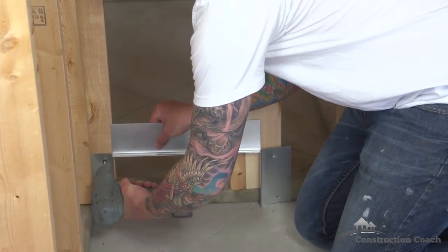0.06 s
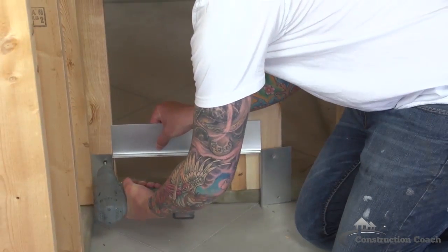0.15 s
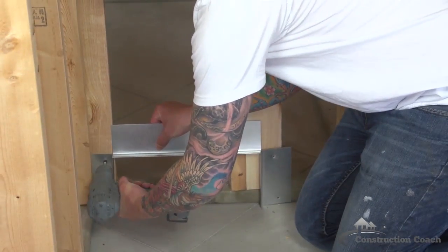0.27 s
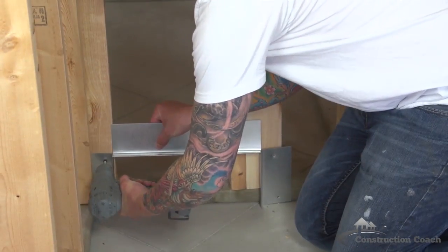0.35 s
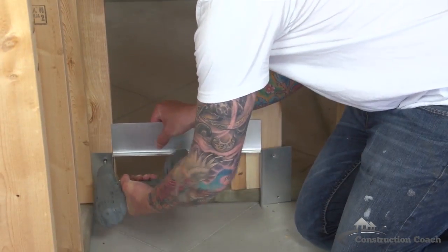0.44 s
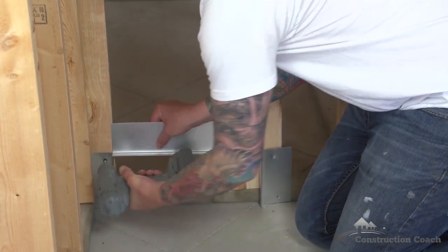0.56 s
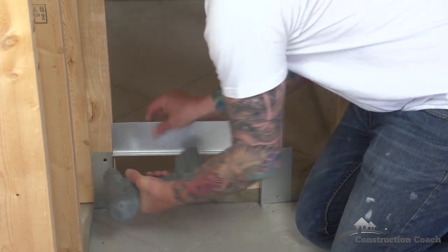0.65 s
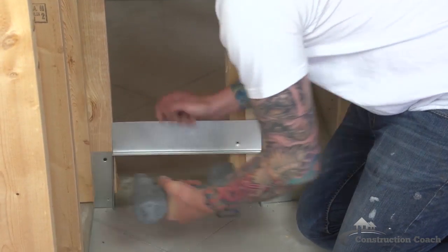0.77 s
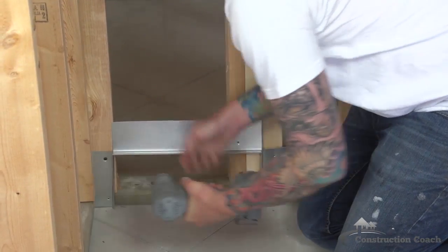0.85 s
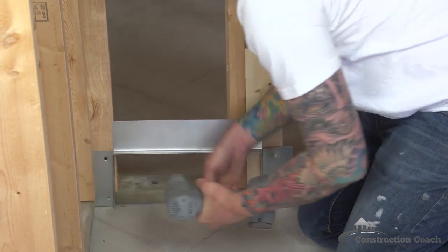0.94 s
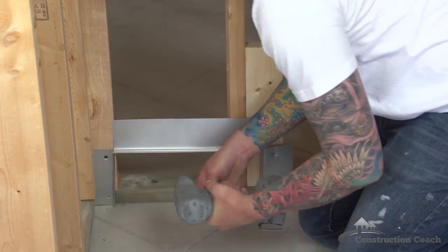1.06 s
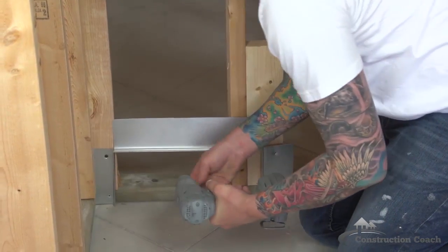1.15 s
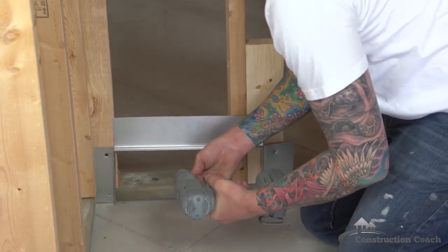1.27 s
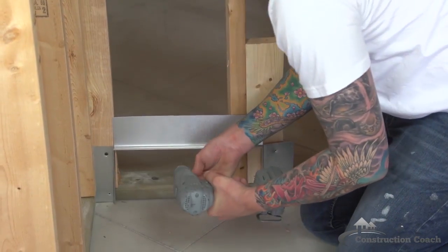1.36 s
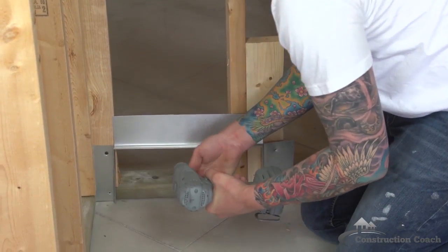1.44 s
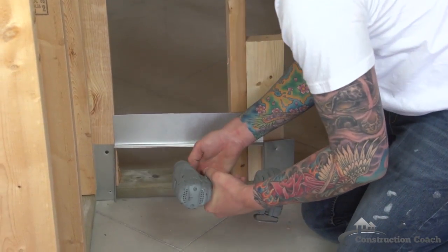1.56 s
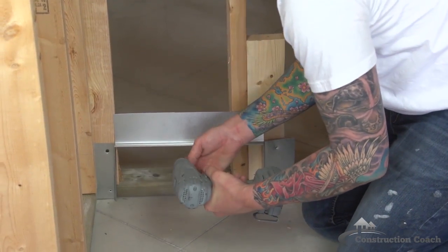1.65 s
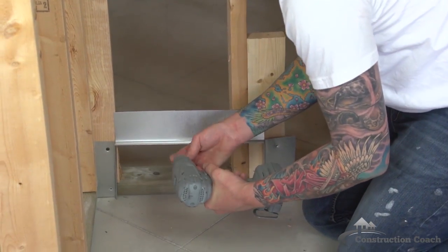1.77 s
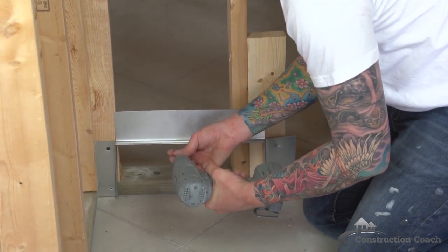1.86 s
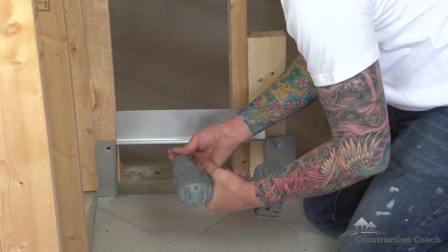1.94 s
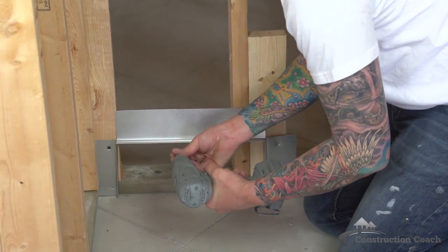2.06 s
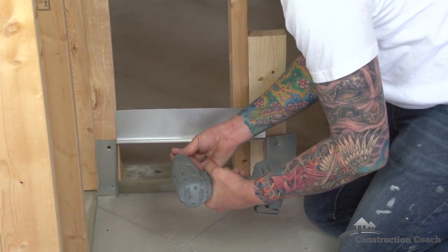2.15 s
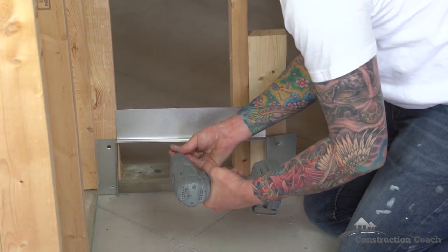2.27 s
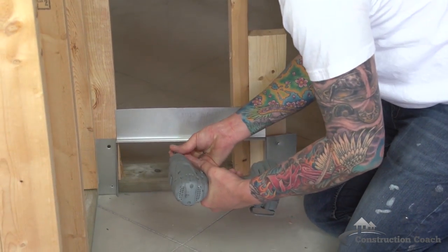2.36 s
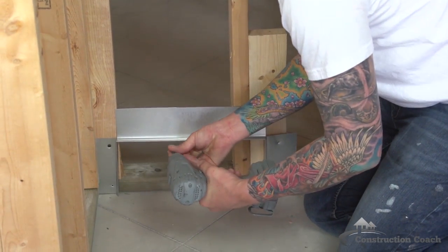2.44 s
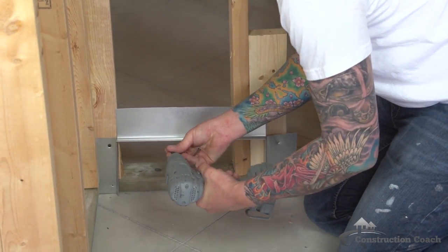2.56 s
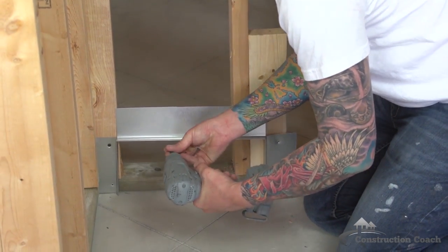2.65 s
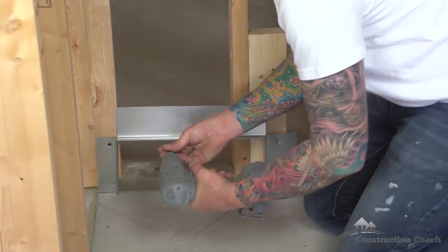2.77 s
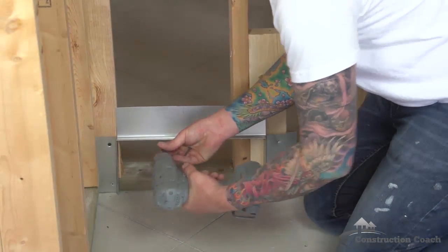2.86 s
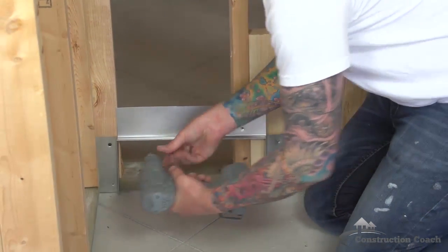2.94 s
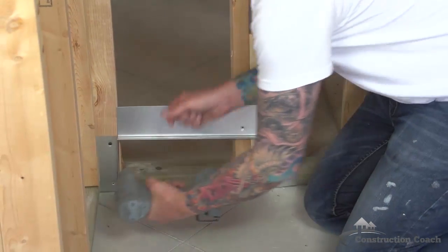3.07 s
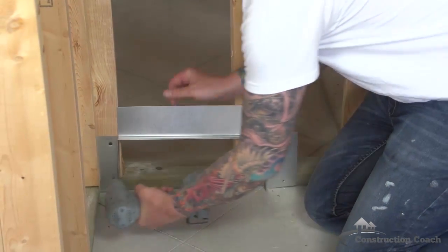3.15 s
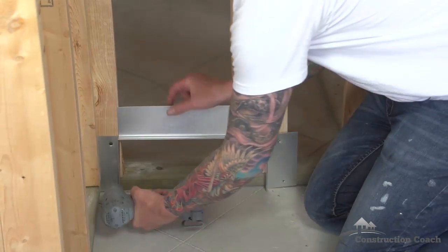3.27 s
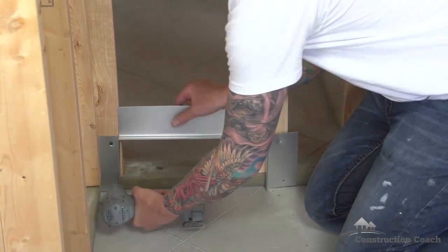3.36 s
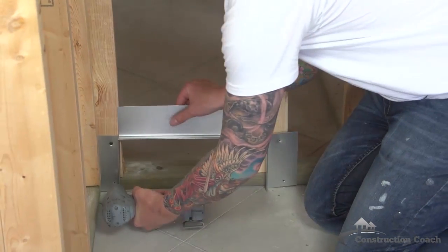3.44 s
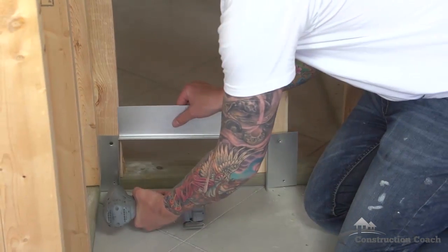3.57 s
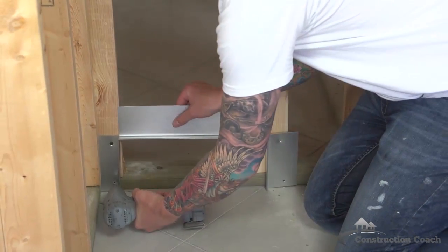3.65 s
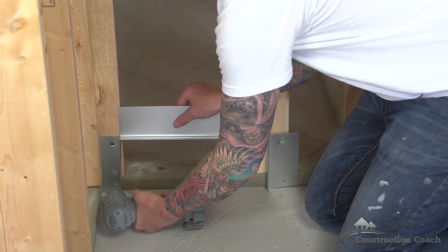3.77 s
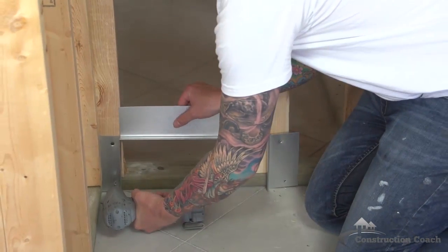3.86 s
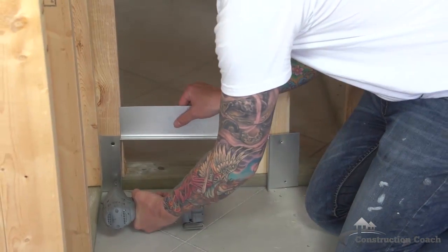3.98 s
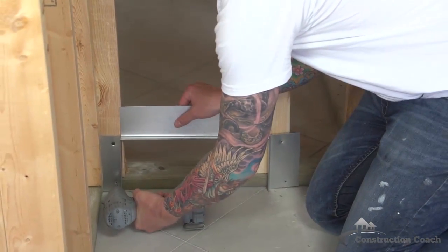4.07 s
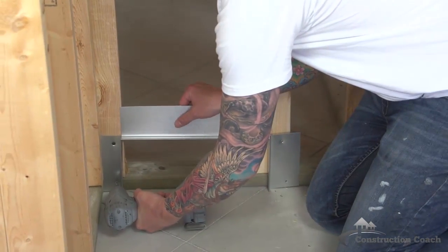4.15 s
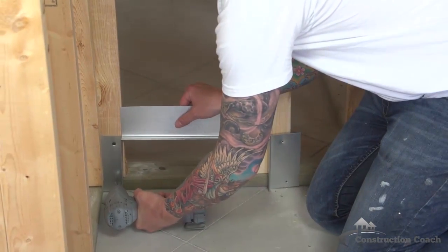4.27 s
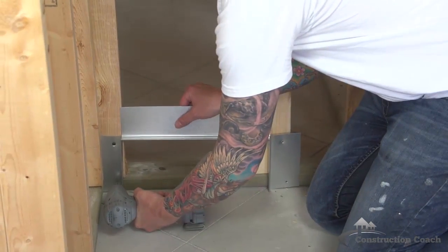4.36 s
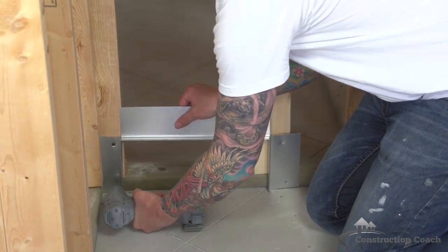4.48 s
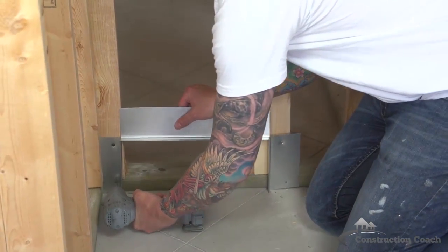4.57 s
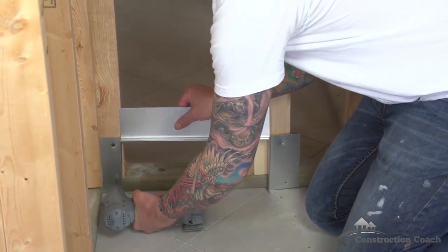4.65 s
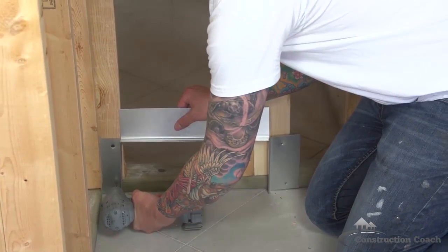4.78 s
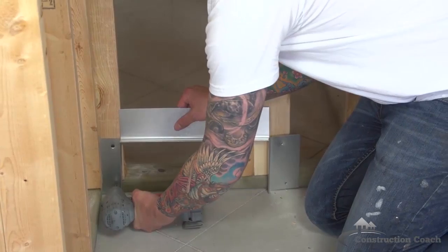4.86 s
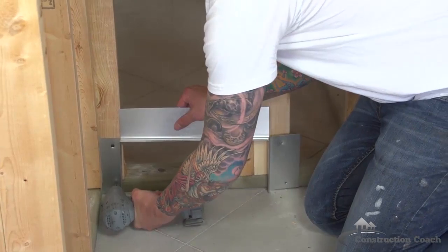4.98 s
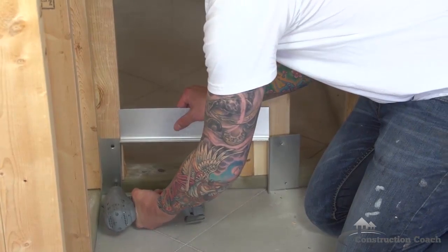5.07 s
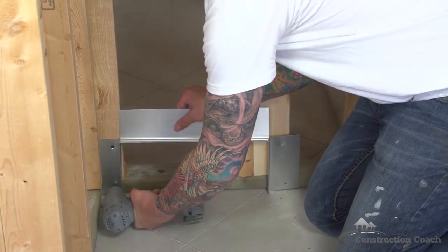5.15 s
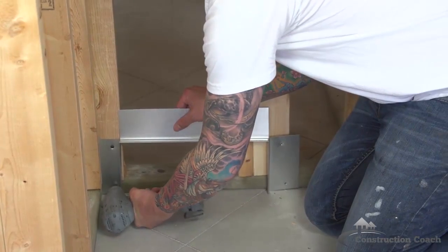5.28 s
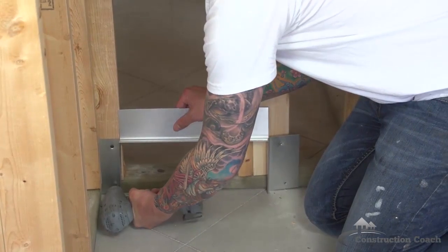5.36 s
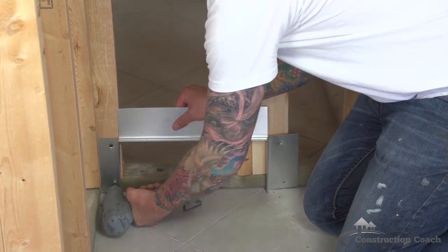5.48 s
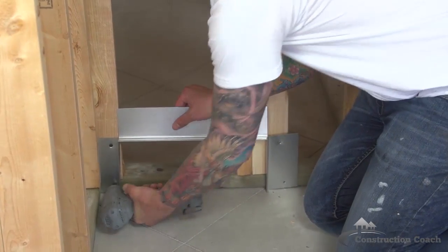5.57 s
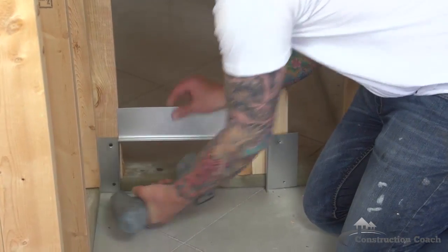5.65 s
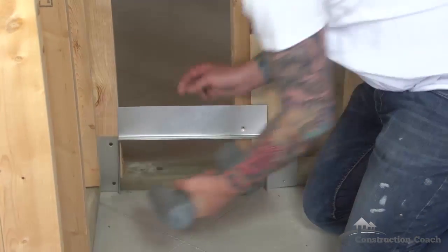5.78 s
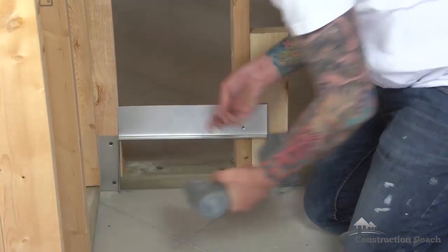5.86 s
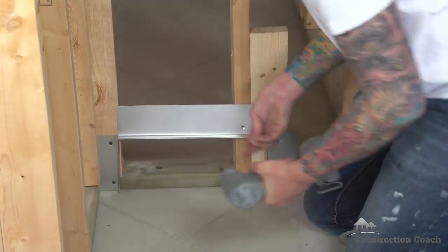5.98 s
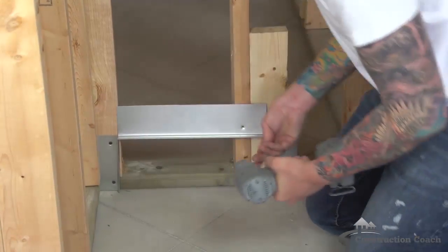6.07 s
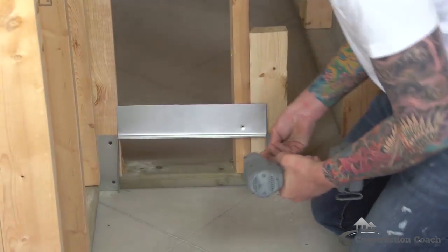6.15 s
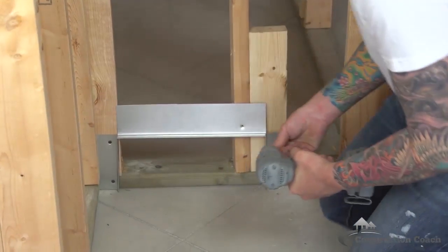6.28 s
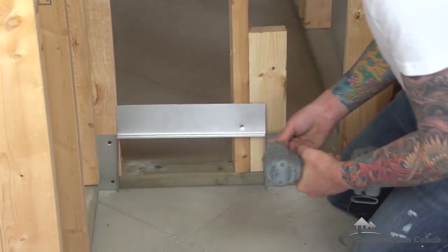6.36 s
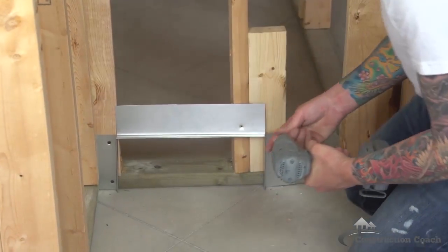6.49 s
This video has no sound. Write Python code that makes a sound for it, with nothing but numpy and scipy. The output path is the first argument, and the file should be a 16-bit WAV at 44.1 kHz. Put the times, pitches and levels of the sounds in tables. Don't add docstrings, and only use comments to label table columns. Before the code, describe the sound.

Close in a bare concrete basement, a cordless drill snaps on, whines briefly and brakes with a clack, then gives a short low groan. Loose screws tinkle, the bit ticks against a screw head, sheet metal scrapes and the tip patters on wood. Two longer whirring pulls follow, then a last growl ends in a loud double crack. Light ticks finish, over faint low rumble and hiss.

```python
import sys
import numpy as np
from scipy import signal
from scipy.fft import rfft, irfft
from scipy.io import wavfile
from scipy.ndimage import uniform_filter1d

SR = 44100
rng = np.random.default_rng(int(sys.argv[2]) if len(sys.argv) > 2 else 0)


def inscribe(sig):
    pcm = np.round(np.clip(np.atleast_2d(sig).T, -1, 1) * 32767)
    wavfile.write(sys.argv[1], SR, pcm.astype(np.int16))


def linear_from_db(decibels):
    return 10 ** (np.asarray(decibels, float) / 20)


N = 287532
T = np.arange(N) / SR

# [f/Hz, density/dB]
AIR_COLOUR = [(12, -37), (20, -10.5), (97, 1), (157, -9), (210, -10.5), (421, -19.5), (481, -20.5),
              (1480, -30), (2150, -33), (3480, -36), (11900, -40.5), (15500, -76), (22000, -120)]
AIR_DB = -73
# [f/Hz, width/Hz, resting level/dB]
RUMBLE_BANDS = [(48, 7.6, -74), (81.6, 20., -68)]
# [t/s, lower rumble level/dB, upper rumble level/dB]
FOOTFALLS = [(0.0, -53, -50), (0.49, -59, -80), (0.76, -58, -49.5), (1.03, -54, -54), (1.22, -57, -52),
             (1.32, -56, -54), (1.58, -65, -57.5), (1.89, -61.5, -47.5), (2.28, -64.5, -50),
             (2.43, -57.5, -79), (2.67, -59, -64.5), (3.21, -54, -66), (3.41, -76.5, -63.5),
             (3.69, -80.5, -64), (3.78, -58.5, -65), (4.05, -48.5, -64.5), (4.12, -54.5, -57),
             (4.39, -71, -69), (4.85, -55, -74), (5.03, -54, -57), (5.63, -59.5, -56), (5.96, -57, -45.5),
             (6.15, -61, -83.5), (6.41, -59.5, -68)]
SWELL_DB = 30

# [f/Hz, T60/s]
ROOM_T60 = [(125, .9), (250, 0.99), (500, 0.48), (1000, 0.56), (2000, 0.53), (4000, 0.5), (8000, 0.34),
            (14000, 0.17)]
# [f/Hz, level/dB]
LEFT_LEAN = [(60, -1.5), (400, -1.5), (1000, -2.5), (2200, -7.5), (4500, -4), (8000, -7.5), (12000, -23.5),
             (20000, -40.5)]
# [f/Hz, level/dB]
TAIL_WIDTH = [(100, -11), (1000, -7), (3000, -4), (6000, 0), (10000, -0.5), (12500, -11), (16000, -30)]
ROOM_DB, LEFT_DB, WIDE_DB = -7.5, -18, -28

# [t of peak/s, rasp level/dB, swell/s, fade/s, wood minus rasp/dB]
DRAGS = [(0.715, -48, 0.098, 0.26, 2), (1.748, -71, 0.011, 0.43, -9), (1.908, -76.5, .025, 0.61, -8),
         (2.256, -83.5, .22, 0.28, -14), (2.314, -66, 0.028, 0.1, -17), (3.29, -71.5, 0.02, 0.35, 10.5),
         (3.362, -54.5, 0.0086, 0.25, 0.5), (3.446, -52, 0.04, 0.24, 1.5), (3.6, -69, 0.16, 0.12, 0.5),
         (3.848, -67.5, .015, 0.096, -1.5), (4.13, -69.5, 0.034, 0.23, 8.5),
         (4.225, -73.5, 0.036, 0.42, 7.5), (4.33, -77.5, .05, .3, 7), (4.459, -45.5, 0.12, 0.1, 1.5),
         (4.68, -65.5, 0.74, 0.029, 4), (5.812, -41.5, 0.53, 0.22, -9), (6.196, -63.5, 0.47, 0.54, -5),
         (6.31, -54.5, 0.027, 0.15, -15), (6.472, -59.5, 0.21, 0.45, 0.5)]
# [f/Hz, density/dB]
WOOD_COLOUR = [(71, -23.5), (120, -41.5), (285, -9.5), (354, -5), (530, -9), (644, -6.5), (772, -9.5),
               (1250, -6.5), (2200, -12), (2860, -31), (4840, -120)]
# [f/Hz, level/dB, T60/s]
WOOD_MODES = [(669, 0.5, 0.055), (926, -6, 0.027), (1040, -1, 0.15), (1340, -4.5, 0.035),
              (1610, -0.5, 0.011)]

# [t/s, level/dB, f/Hz, ring/dB, treble/dB]
SCREWS = [(0.952, -63.5, 10000, 1, -30), (1.805, -66, 10100, -5, -31), (0.9875, -48, 10000, -7.5, -2),
          (1.1514, -65, 10300, -12.5, -25), (1.1987, -54.5, 10120, -17, -11),
          (1.2194, -59.5, 9950, -17, -22), (1.7508, -60, 10100, -12, -29), (1.776, -58.5, 10000, -13, -30),
          (1.8494, -48, 10300, -11.5, -13), (1.9077, -42.5, 11000, -14, -14),
          (2.051, -55.5, 10120, -15.5, -23.5)]
# [f/Hz, level/dB, T60/s]
SCREW_MODES = [(10100, 2, 0.11), (10300, 1.5, 0.029)]
# [t/s, level/dB, f/Hz, ring/dB, treble/dB]
PINGS = [
    (0.0054, -38.5, 2260, -5, -40),
    (.435, -44, 4500, -4, -15),
    (.4611, -35, 3290, -12, -35),
    (.716, -66, 8620, 5, -30),
    (2.806, -82, 8050, 3, -32),
    (6.378, -74, 721, 7, -60),
    (6.405, -69, 721, 10, -58),
    (6.468, -67, 721, 11, -56),
]
# [f/Hz, level/dB, T60/s]
PING_MODES = [(721, 0, .2), (2260, 0, .03), (3290, -0.5, .02), (4500, 0, .02), (8050, -4.5, .08),
              (8620, -1, 0.2)]
# [t/s, level/dB, f/Hz, ring/dB, treble/dB]
PUSHES = [
    (3.6, -60, 160, 9.5, -62.5),
    (5.1, -40.5, 150.5, -2.5, -60),
    (.036, -41.5, 156, -4.5, -59.5),
    (5.581, -36, 190, -3.5, -58),
]
# [f/Hz, level/dB, T60/s]
FRAME_MODES = [(156, 4, 0.094), (245.6, -6, .15), (512, -6, 0.063)]
# [t/s, level/dB, f/Hz, ring/dB, treble/dB]
TAPS = [(4.103, -59, 1500, -4, -20), (4.126, -51.5, 1340, -5, -26), (4.144, -58.5, 985, 0, -28.5),
        (4.171, -59, 1080, -6, -28), (4.211, -56, 1340, -10, -28), (4.224, -50, 1330, -7.5, -28),
        (4.232, -55, 910, -3, -28), (4.249, -62, 918, -4, -26), (4.294, -58, 1380, -5, -27.5),
        (4.323, -57, 1030, -5, -28), (4.332, -62, 939, -4.5, -26), (4.364, -61, 921, -7, -30),
        (4.381, -53, 923, -5.5, -24)]
# [f/Hz, level/dB, T60/s]
TAP_MODES = [(641, -8, .05), (921, -5, 0.085), (1080, -4, 0.064), (1340, -1, 0.086), (1620, -5, 0.084),
             (1830, -5, 0.041), (2500, -4, .04), (3860, -5.5, .04), (5160, -3.5, 0.054), (5750, -4, .06),
             (6890, -3, .07), (9870, -5, .07)]
# [t/s, level/dB, f/Hz, ring/dB, treble/dB]
BUMPS = [(3.3495, -53, 1870, -14, -20), (3.3645, -52.5, 1870, -2.5, -18.5),
         (3.4315, -49.5, 4800, -3.5, -10), (3.444, -49.5, 5030, -6.5, -15), (4.3855, -61, 5800, -10, -20),
         (4.4176, -49, 6900, -6.5, -16), (4.4543, -42.5, 1610, -16.5, -16), (4.463, -45, 4800, -15.5, -17),
         (4.4944, -43, 1455, -24, -22), (4.6502, -52, 1240, -19, -14), (4.6673, -59.5, 2220, -19, -10)]
# [f/Hz, level/dB, T60/s]
SHEET_MODES = [(1870, 2.5, .2), (2720, -8, .1), (3020, -3.5, 0.13), (4500, -4, 0.19), (4853, -4, 0.096),
               (5200, -9, .06), (5770, -5.5, 0.17), (6640, 0, 0.15), (6970, -4.5, 0.09), (7570, -4.5, 0.14),
               (8400, -8.5, 0.08), (9280, -8, .08), (10050, -10.5, 0.048), (10200, -8.5, 0.09)]
# [t/s, level/dB, f/Hz, ring/dB, treble/dB]
TICKS = [(0.7143, -41, 1249, -28, -24), (0.8932, -35, 6100, -28, -6.5), (2.161, -44.5, 4130, -28, -12.5),
         (2.179, -61, 4000, -21, -24), (2.268, -56.5, 4900, -18.5, -25), (2.309, -59, 5000, -18, -25),
         (2.796, -60, 2000, -21.5, -30.5), (2.2332, -50, 4000, -19, -23), (2.2508, -52.5, 4000, -23.5, -8),
         (2.3161, -44.5, 3800, -13, -9.5), (2.3478, -50, 3930, -19.5, -22), (2.3515, -54, 3870, -17.5, -18),
         (2.4622, -45, 4000, -23, -13), (2.6462, -46.5, 2600, -21, -14.5), (2.6487, -36, 4500, -22, -9.5),
         (2.657, -48.5, 1000, -26, -45), (2.8035, -55.5, 1267, -22.5, -21.5),
         (2.9318, -40, 3840, -25.5, -19), (3.0287, -59.5, 3770, -21.5, -29.5),
         (3.1648, -57.5, 1440, -25, -10.5), (3.8224, -64.5, 1600, -23, -20.5),
         (6.1814, -43, 4380, -21.5, -7), (6.1973, -49.5, 10820, -27.5, 5), (6.2114, -48, 4410, -23, -6),
         (6.2238, -43, 4500, -23, -8), (6.3114, -63.5, 4060, -23.5, -26), (6.252, -57, 10300, -26, 2),
         (6.4664, -47, 4500, -27.5, 1.5)]
# [f/Hz, level/dB, T60/s]
BIT_MODES = [(2080, 10, 0.015), (2970, 1, .01), (3850, 9.5, 0.027), (4050, 4, 0.0094), (4500, -1, 0.013),
             (4660, 5, 0.02), (5100, 0, 0.013), (5630, -3, .012), (6500, -8.5, .012), (7300, -3, .01)]
# [t/s, level/dB, f/Hz, ring/dB, treble/dB]
SEATING = [
    (5.5792, -1.5, 1098, -17.5, -16.5),
    (5.6018, -7.5, 1290, -18.5, -13.5),
]
# [f/Hz, level/dB, T60/s]
SEAT_MODES = [(281, -14, 0.079), (430, -9.5, 0.056), (649, -8.5, 0.045), (740, -5.5, 0.055),
              (910, -5, 0.06), (1050, 0, 0.069), (1208, -2.5, 0.074), (1372, -5.5, 0.064),
              (1532, -7.5, 0.053), (1780, -5, 0.058), (2135, -4.5, 0.071), (2650, -7.5, 0.059),
              (3840, -9, 0.049), (4800, -10.5, .04)]
# [t/s, level/dB, f/Hz, ring/dB, treble/dB]
BRAKES = [
    (0.187, -15.5, 2500, -8, -19.5),
]
# [f/Hz, level/dB, T60/s]
CASE_MODES = [(2460, -3, 0.013), (4205, -2.5, 0.027), (4830, -3.5, .022), (5500, 2, .022), (6850, -3, .022)]
# [t/s, level/dB, f/Hz, ring/dB, treble/dB]
SNAPS = [
    (0.0345, -6.5, 2934, -22, -9.5),
    (0.4756, -9.5, 3200, -18.5, -17),
]
# [t/s, level/dB, f/Hz, ring/dB, treble/dB]
KNOCKS = [
    (0.0245, -36, 6910, -25, -9),
    (0.047, -27, 1300, -1, -30.5),
    (4.6873, -42, 1500, -8, -21),
    (4.7187, -32, 2270, -6, -17),
    (4.7013, -33.5, 4160, -9, -9.5),
    (5.462, -33.5, 2350, -14, -12),
    (5.473, -27.5, 1060, -13, -27.5),
]
# [f/Hz, level/dB, T60/s]
STUD_MODES = [(402, -7.5, 0.13), (637, -7, 0.15), (758, -7.5, 0.23), (826, -21, 1.2), (895, -8, 0.29),
              (920, -13, 0.83), (1136, 0.5, 0.075), (1070, -3, 0.093), (1206, -12, 0.26), (1300, -3, 0.23),
              (1440, -4.5, 0.45), (1510, -20, 5.0), (1631, -23.5, 2.0), (1760, -12.5, 0.35)]

# [t/s, tooth rate f/Hz, effort level/dB]
PULLS = [
    [(0.024, 1120, -45.5), (0.034, 1256, -33), (0.052, 1464, -28.5), (0.088, 2224, -26.5),
     (0.103, 2267, -24.5), (0.134, 2320, -28), (0.15, 2162, -25.5), (0.174, 1136, -33), (0.19, 854, -35)],
    [(0.477, 1050, -34), (0.5, 1085, -30.5), (0.53, 1228, -32), (0.56, 1208, -35.5)],
    [(4.685, 713.5, -55), (4.725, 1264, -36), (4.791, 2047, -27.5), (4.87, 2320, -27.5),
     (4.931, 2246, -25.5), (4.981, 1957, -27.5), (5.019, 1620, -30.5), (5.065, 1140, -31.5),
     (5.115, 730, -35.5)],
    [(5.115, 814, -39), (5.129, 1260, -31), (5.155, 1980, -28), (5.185, 2270, -26.5), (5.225, 2472, -25.5),
     (5.27, 2623, -24), (5.31, 2383, -26), (5.325, 2000, -32.5), (5.345, 1100, -30)],
    [(5.472, 950, -39), (5.488, 1020, -31.5), (5.508, 1340, -28.5), (5.53, 1430, -29), (5.555, 1390, -32),
     (5.58, 1290, -28)],
]
# [whine level/dB, wood load at full speed/dB, load per octave of speed/dB]
BITES = [(-2.5, -9, -11.5), (-1.5, -8, -10), (-7, -15.5, -3.5), (-3.5, -12, -5.5), (-1.5, -9, -0.5)]
# [multiple, level/dB, flutter rate per s]
TEETH = [(1, -14, 340), (2, -6.5, 600), (3, -8.5, 560), (4, -7.5, 800), (5, -9.5, 1000)]
# [f/Hz, width/Hz, lift/dB]
GEARBOX = [(1200, 320, 8), (2318, 450, 5), (4560, 660, 5.5), (7020, 730, 7.5), (10730, 980, 7)]
# [f/Hz, density/dB]
HOUSING_COLOUR = [(700, -42), (1200, -17), (2500, -8), (4500, -3), (7000, -4), (9000, -2.5), (11500, -7.5),
                  (16000, -18)]
# [f/Hz, density/dB]
STUD_COLOUR = [(76, -49), (130, -31.5), (166, -25.5), (251, -9), (376, -16.5), (491, -6), (529, -9.5),
               (651, -5), (872, -5), (1880, -8.5), (2400, -10.5), (3120, -16.5), (5280, -120)]
FULL_HZ, PINION_TEETH = 2400, 11
WHINE_DB_PER_OCTAVE = -7
SPIN_UP_DB = -0.1213


def unit(x):
    return x / np.sqrt(np.mean(x ** 2) + 1e-30)


def noise():
    return rng.standard_normal(N)


def tilt(x, points):
    hz, db = np.transpose(points)
    f = np.fft.rfftfreq(len(x), 1 / SR) + 1
    gain = linear_from_db(np.interp(np.log(f), np.log(hz), db))
    return irfft(rfft(x) * gain, len(x))


def colour(x, points):
    return unit(tilt(x, points))


def walk(rate):
    k = max(int(SR / rate), 1)
    steps = np.repeat(rng.standard_normal(N // k + 1), k)
    return unit(uniform_filter1d(uniform_filter1d(steps, k), k)[:N])


def swells(peak_s, db, swell_s, fade_s):
    coarse = T[::32]
    s = coarse - np.array(peak_s)[:, None]
    span_s = np.where(s < 0, np.reshape(swell_s, (-1, 1)), np.reshape(fade_s, (-1, 1)))
    level_db = np.array(db)[:, None] - SWELL_DB * np.abs(s) / span_s
    return np.interp(T, coarse, linear_from_db(level_db).sum(axis=0))


def band(x, hz, width):
    return signal.lfilter(*signal.iirpeak(hz, hz / width, fs=SR), x)


def ring(x, modes, longest_s):
    out = 0
    for hz, db, t60 in modes:
        pole = np.exp(2j * np.pi * hz / SR - np.log(1000) / (min(t60, longest_s) * SR))
        out = out + linear_from_db(db) * signal.lfilter([1], [1, -pole], x).imag
    return out


def crack_sound(draw, t, hz, treble_db, broad_db, crack_s, low_hz):
    burst = draw * np.minimum(t / (.5 * crack_s), 1) * np.exp(-t / crack_s)
    burst = irfft(np.exp(1j * np.angle(rfft(burst)))) * np.exp(-t / (3 * crack_s))
    broad = signal.sosfilt(signal.butter(2, [low_hz, 8000], "band", fs=SR, output="sos"), burst)
    treble = signal.sosfilt(signal.butter(3, 8500, "high", fs=SR, output="sos"), burst)
    crack = linear_from_db(broad_db) * broad + 2 * band(band(burst, hz, 0.88 * hz), hz, 0.22 * hz)
    return crack / np.abs(crack).max() + linear_from_db(treble_db + 11.0) * treble / np.abs(treble).max()


def hits(events, modes, broad_db, crack_s, low_hz, scatter_db, lean_db=2.5, longest_s=1., spread=.003,
         rough_db=0.):
    mode_hz, mode_db, t60 = np.transpose(modes)[:, :, None]
    t60 = np.minimum(t60, longest_s)
    out = np.zeros(N + SR)
    t = T[:1024 + int(SR * min(t60.max(), .5))]
    flutter = linear_from_db(rough_db * walk(400))
    apart = np.arange(len(t)) + 4001 * np.arange(len(modes))[:, None]
    chance = rng.standard_normal((len(events), 1024 + 3 * len(modes)))
    for (s, db, hz, ring_db, treble_db), draw in zip(events, chance):
        i = int(s * SR)
        out[i:i + 1024] += linear_from_db(db) * crack_sound(draw[:1024], t[:1024], hz, treble_db, broad_db, crack_s, low_hz)
        share, detune, start = draw[1024:].reshape(3, -1, 1)
        near_db = -lean_db * np.abs(np.log2(mode_hz / hz))
        decay = linear_from_db(mode_db + near_db + scatter_db * share - 60 * t / t60)
        tone = np.sin(2 * np.pi * mode_hz * (1 + spread * detune) * t + 2 * start)
        rings = decay * tone * flutter[(i + apart) % N]
        out[i:i + len(t)] += linear_from_db(db + ring_db) * rings.sum(axis=0) * np.minimum(t / 0.00027, 1)
    return out[:N]


def building():
    s, *steps_db = np.transpose(FOOTFALLS)
    edge = [(12100, AIR_COLOUR[-3][1]), (12300, -80)]
    out = colour(noise(), AIR_COLOUR[:-2] + edge) * linear_from_db(AIR_DB + 6.5 + 1.0 * walk(2.8))
    for db, (hz, width, rest_db) in zip(steps_db, RUMBLE_BANDS):
        rumble = unit(band(band(noise(), hz, width), hz, width))
        rumble = rumble / np.sqrt(uniform_filter1d(rumble ** 2, 3000) + 0.25)
        out = out + rumble * (linear_from_db(rest_db) + swells(s, db, swell_s=0.12, fade_s=0.092))
    return out


def room(x):
    t, tail = T[:SR], 0
    for hz, t60 in ROOM_T60:
        edges_hz = [hz / np.sqrt(2), min(hz * np.sqrt(2), .45 * SR)]
        edges = signal.butter(3, edges_hz, "band", fs=SR, output="sos")
        tail = tail + signal.sosfilt(edges, rng.standard_normal((2, SR))) * linear_from_db(-60 * t / t60)
    tail = tail * np.clip((t - .002) / 0.0035, 0, 1)
    tail = tail / np.sqrt(np.sum(tail[0] ** 2))
    mid, apart = signal.fftconvolve(x[None], tail, axes=1)[:, :N]
    return mid, apart


def drags():
    s, rasp_db, swell_s, fade_s, wood_db = np.transpose(DRAGS)
    grains = noise() * linear_from_db(2.1 * walk(900) + 1.5 * walk(35))
    rasp = colour(grains, [(1200, -23.5), (2500, 4.5), (5000, 2), (9000, -5.5), (15000, -13.0)])
    wood = linear_from_db(-8.0) * colour(grains, WOOD_COLOUR)
    wood = wood + linear_from_db(-10.5) * unit(ring(grains, WOOD_MODES, 0.011))
    wood = wood + linear_from_db(-21) * unit(band(grains, 190.0, 54.0))
    push = swells(s, rasp_db, swell_s, fade_s)
    held_s = .05
    sheet = ring(push * linear_from_db(-18.5) * grains, SHEET_MODES, held_s) / np.std(ring(grains, SHEET_MODES, held_s))
    return linear_from_db(-7.5) * push * rasp + swells(s, rasp_db + wood_db, swell_s, fade_s) * wood + sheet


def loose_parts():
    screws = hits(SCREWS, SCREW_MODES, broad_db=-6.0, crack_s=0.00013, low_hz=2420, scatter_db=-3.0)
    pings = hits(PINGS, PING_MODES, broad_db=-23.5, crack_s=.002, low_hz=600, scatter_db=0.5,
                 lean_db=150.5, rough_db=0.5)
    return linear_from_db(2.0 * walk(150)) * screws + pings


def bit_contacts():
    pushes = hits(PUSHES, FRAME_MODES, broad_db=-11.0, crack_s=0.004, low_hz=120, scatter_db=-1.0)
    taps = hits(TAPS, TAP_MODES, broad_db=-13.5, crack_s=0.0048, low_hz=902, scatter_db=2.0,
                lean_db=7.0, spread=.01, rough_db=4.5)
    bumps = hits(BUMPS, SHEET_MODES + WOOD_MODES, broad_db=-5.0, crack_s=0.0058, low_hz=900, scatter_db=2.5,
                 lean_db=3.5, longest_s=0.2, spread=0.0038, rough_db=5.0)
    ticks = hits(TICKS, BIT_MODES, broad_db=9, crack_s=.0017, low_hz=1600, scatter_db=1.5,
                 lean_db=14, longest_s=.02, spread=.025, rough_db=6.5)
    return pushes + taps + bumps + ticks


def drill_knocks():
    seating = hits(SEATING, SEAT_MODES, broad_db=9.5, crack_s=0.00081, low_hz=900, scatter_db=0.5,
                   lean_db=3.5, spread=0.014, rough_db=6.5)
    brakes = hits(BRAKES, CASE_MODES, broad_db=-0.5, crack_s=0.00098, low_hz=1493, scatter_db=1.9,
                  lean_db=-1.35, spread=0.018, rough_db=5.5)
    snaps = hits(SNAPS, STUD_MODES, broad_db=10, crack_s=.00016, low_hz=700, scatter_db=0.5,
                 longest_s=0.026, rough_db=5.5)
    knocks = hits(KNOCKS, STUD_MODES, broad_db=-3.5, crack_s=0.00071, low_hz=892.5, scatter_db=-3.0,
                  lean_db=0.5, longest_s=0.043, rough_db=3.5)
    return seating + brakes + snaps + knocks


def trigger(pulls, edge_s=.006):
    s, *columns = np.transpose(np.concatenate(pulls))
    gate = sum(np.clip(np.minimum(T - p[0][0], p[-1][0] - T) / edge_s + .5, 0, 1) for p in pulls)
    return gate, [np.interp(T, s, c) for c in columns]


def gearbox_db(hz):
    return sum(db / (1 + ((hz - centre_hz) / width) ** 2) for centre_hz, width, db in GEARBOX) - 4


def gear_whine(hz, octaves):
    phase = 2 * np.pi * np.cumsum(hz * (1 + .015 * walk(200))) / SR
    soft_db = 2.8 * octaves
    strands = 2 ** octaves * (1 + 1.1 * np.cos(phase / PINION_TEETH))
    whine = 0
    for k, db, rate in TEETH:
        level = linear_from_db(db + (k - 1) * soft_db + gearbox_db(k * hz))
        steady = (1.5 / k * strands + walk(rate)) * np.sin(k * phase)
        whine = whine + level * (steady + walk(rate) * np.cos(k * phase))
    return whine


def motor_hiss():
    rattle = noise() * linear_from_db(1.1 * walk(500))
    case = sum(linear_from_db(db) * band(rattle, centre_hz, width) for centre_hz, width, db in GEARBOX[1:])
    return colour(rattle, HOUSING_COLOUR) * linear_from_db(-6.0) + unit(case) * linear_from_db(-14.5)


def drill():
    bitten = [[row + bite for row in pull] for pull, bite in zip(PULLS, BITES)]
    gate, (hz, effort_db, whine_db, load_db, slope_db) = trigger(bitten)
    hz = uniform_filter1d(hz, size=800)
    octaves = np.log2(hz / FULL_HZ)
    stud = colour(noise(), STUD_COLOUR) * linear_from_db(2.0 * walk(90) - 1.5)
    boom = linear_from_db(-20.5) * unit(band(noise(), 155., 41.0))
    speeding_up = np.clip(uniform_filter1d(np.gradient(octaves) * SR, size=600), 0, 25)
    groan = linear_from_db(whine_db + WHINE_DB_PER_OCTAVE * octaves + SPIN_UP_DB * speeding_up)
    load = linear_from_db(load_db + slope_db * octaves)
    voice = motor_hiss() + groan * gear_whine(hz, octaves) + load * (stud + boom)
    return gate * linear_from_db(effort_db + 1.2 * walk(60)) * voice


def scene():
    work = drags() + loose_parts() + bit_contacts() + drill_knocks() + drill()
    work = signal.sosfilt(signal.butter(6, 120, "high", fs=SR, output="sos"), work)
    tail, apart = room(work)
    mid = work + linear_from_db(ROOM_DB) * tail + building()
    side = linear_from_db(LEFT_DB) * tilt(mid, LEFT_LEAN) + linear_from_db(WIDE_DB) * tilt(apart, TAIL_WIDTH)
    side = side + colour(noise(), AIR_COLOUR) * linear_from_db(AIR_DB - 30.5)
    return np.array([mid + side, mid - side])


def top_cut(x):
    return signal.sosfilt(signal.butter(12, 16970, fs=SR, output="sos"), x)


def record(dry):
    low_pass = signal.ellip(8, .2, 60, 15900, fs=SR, output="sos")
    mix = signal.sosfilt(low_pass, np.clip(dry, -.93, .93))
    return top_cut(mix)


dry = scene()
out = record(dry)
inscribe(out)
```